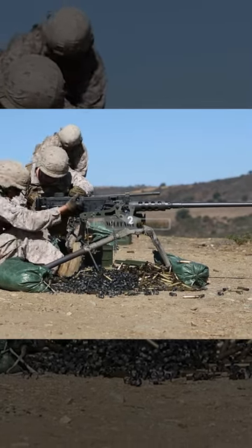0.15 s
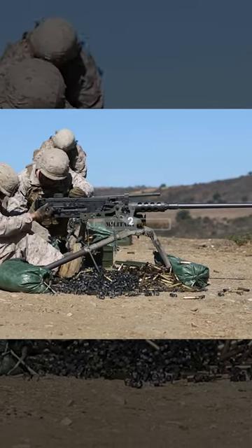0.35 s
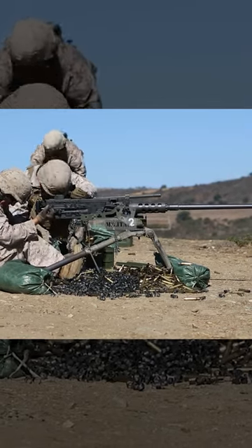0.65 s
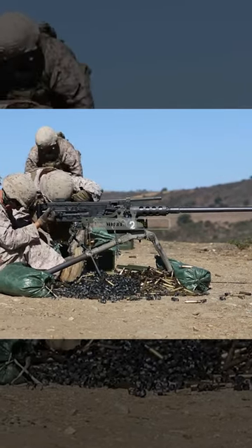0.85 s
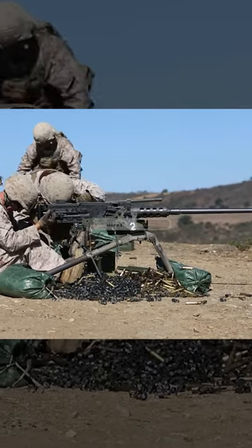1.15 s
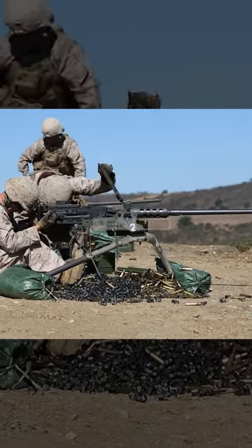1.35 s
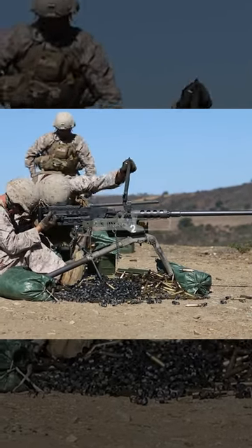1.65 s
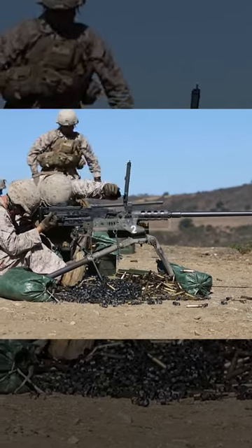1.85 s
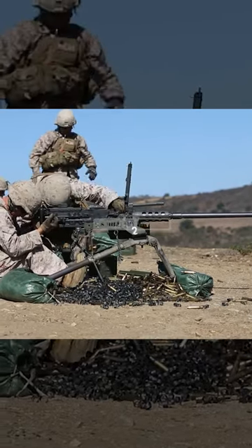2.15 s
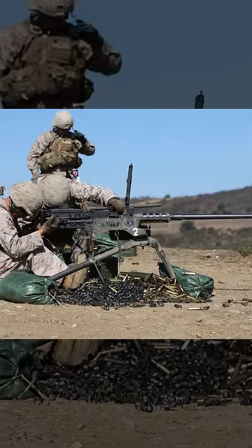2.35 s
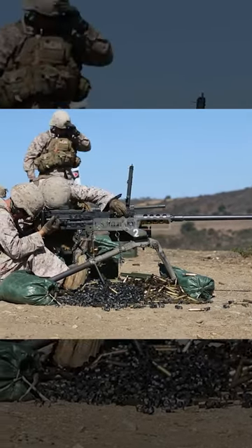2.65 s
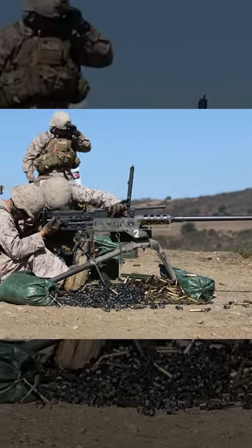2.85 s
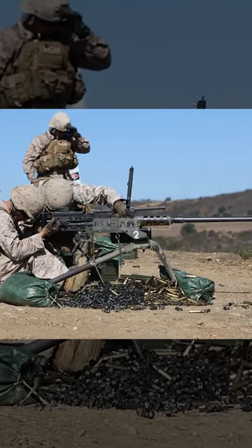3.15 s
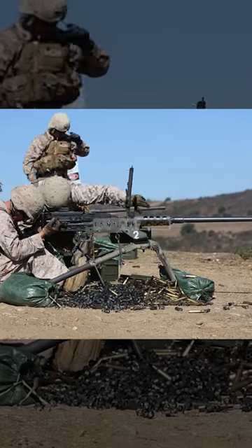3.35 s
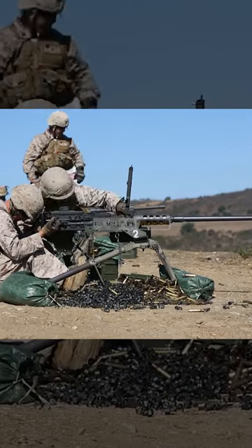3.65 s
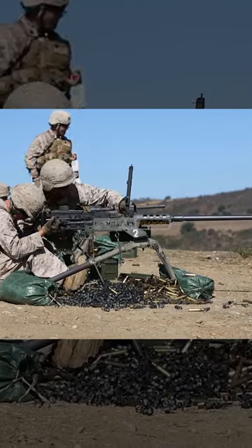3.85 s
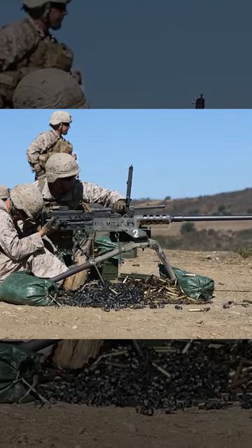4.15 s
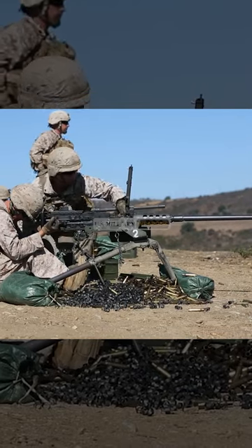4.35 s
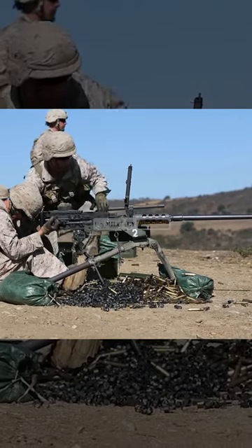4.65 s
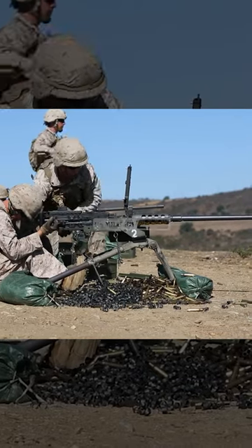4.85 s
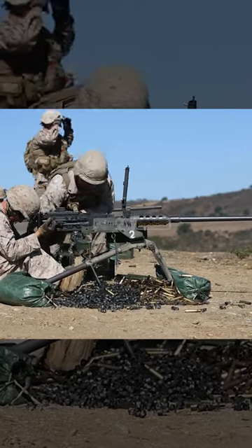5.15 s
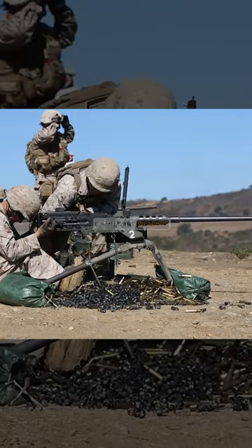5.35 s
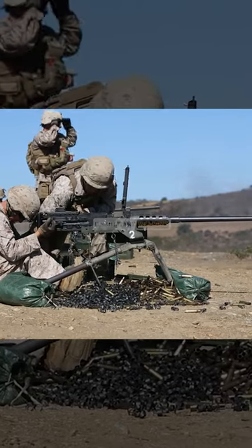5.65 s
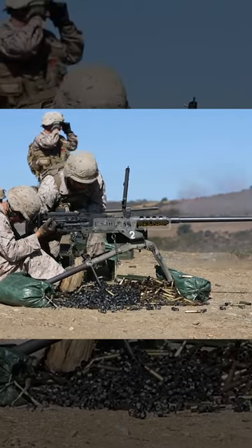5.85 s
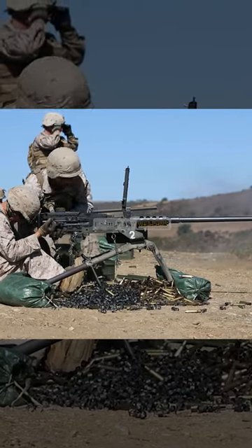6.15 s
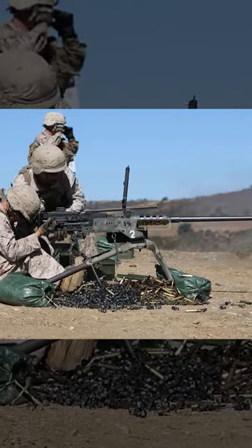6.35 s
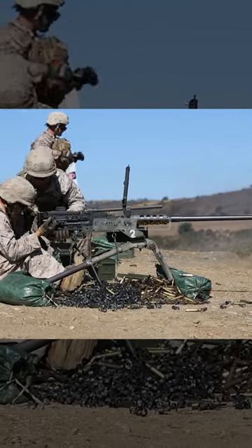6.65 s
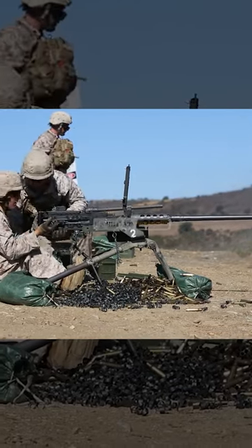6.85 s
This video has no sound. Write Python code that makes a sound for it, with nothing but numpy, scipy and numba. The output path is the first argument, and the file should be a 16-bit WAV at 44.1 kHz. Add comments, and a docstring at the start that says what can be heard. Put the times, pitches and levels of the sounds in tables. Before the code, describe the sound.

Faint outdoor air, light wind rumble on the microphone and a distant idling engine run throughout. From about 0.2 to 0.5 seconds, the action of a heavy machine gun is worked close by with sharp steel clacks and a gritty slide. Latch snaps follow near 1.3 seconds, then more clacks and scrapes, with the bolt slamming home around 1.8 and 2.7 seconds. Belt links jingle between 2.1 and 3.4 seconds. A lull follows, with a faint sleeve brush at 4.6 seconds and a small brass clink at 4.9. At about 5.4 seconds the gun fires one very loud, even burst of eleven rounds, each a crack, blast and mechanical thud, ending near 6.6 seconds. The burst distorts the microphone and the level ducks. Spent links and cases tinkle lightly, and dull thumps echo back from the hills in the last half second.

```python
"""An open firing range among scrubby hills, with a light breeze and an engine idling far off.
A gunner works the action and feed of a heavy machine gun on a tripod: steel clacks and slides ring
the receiver, and belt links jingle. Then comes one burst of eleven rounds, each a crack, a muzzle
blast and a thud of the bolt. It overloads the nearby microphone, whose gain control backs off,
while spent links tumble and the hills send the burst back."""
import sys
import numpy as np
from scipy import signal
from scipy.fft import rfft, irfft
from scipy.io import wavfile
from scipy.ndimage import uniform_filter1d, minimum_filter1d
from numba import njit

SR = 44100
rng = np.random.default_rng(int(sys.argv[2]) if len(sys.argv) > 2 else 0)


def wrap_up_sound(samples):
    """Save the sound to the file named by the first command line argument, as 16-bit audio."""
    columns = np.atleast_2d(samples).T
    # keep every value between -1 and 1, then stretch to whole-number steps
    tamed = np.clip(columns, -1, 1)
    steps = np.round(tamed * 32767).astype(np.int16)
    wavfile.write(sys.argv[1], SR, steps)


N = 309141
TIME = np.arange(N) / SR
AGE = TIME[:SR // 2]  # seconds since a blow


def undb(db):
    """Decibels to gain."""
    return 10 ** (np.asarray(db) / 20)


def unit(x):
    """Scale to rms 1."""
    return x / np.sqrt(np.mean(x ** 2))


def fade(t60):
    """Exponential decay, 60 dB down after t60 seconds."""
    return np.exp(-np.log(1000) * AGE / max(t60, 1e-3))


def rise(seconds):
    """A rounded attack."""
    return 1 - np.exp(-AGE / seconds)


def add(out, s, x):
    """Mix x into out at s seconds."""
    i = min(max(int(round(s * SR)), 0), len(out))
    out[i:i + len(x)] += x[:len(out) - i]


def filt(x, hz, kind, order=2):
    """Butterworth filter."""
    return signal.sosfilt(signal.butter(order, hz, kind, fs=SR, output="sos"), x)


def resonate(x, hz, width):
    """One resonance, gain 1 at its centre."""
    return signal.lfilter(*signal.iirpeak(hz, hz / width, fs=SR), x)


def noise(spectrum, size=len(AGE)):
    """Noise of rms 1, coloured by rows of frequency in Hz and level in dB."""
    hz, db = np.transpose(spectrum)
    gain = undb(np.interp(np.log(np.fft.rfftfreq(size, 1 / SR) + 1), np.log(hz), db))
    return unit(irfft(rfft(rng.standard_normal(size)) * gain, size))


def walk(rate):
    """A smooth random drift of rms 1, turning rate times a second."""
    knots = rng.standard_normal(int(N / SR * rate) + 2)
    path = np.interp(TIME * rate, np.arange(len(knots)), knots)
    return unit(uniform_filter1d(path, int(SR / rate / 2)))


def grit(size, spread_db, rate):
    """Rough envelope of tiny catches and slips, rms 1."""
    knots = np.tanh(rng.standard_normal(int(size / SR * rate) + 2))
    return unit(undb(spread_db * np.interp(TIME[:size] * rate, np.arange(len(knots)), knots)))


def note(hz, t60, rise_s=0.0021):
    """One part of the gun rings out."""
    return np.sin(2 * np.pi * hz * AGE) * fade(t60) * rise(rise_s)


# The dark bed of open air. Each row: frequency in Hz, relative level in dB.
AIR_COLOUR = [(15, -41), (25, 0), (79, -2), (193, -9), (221, -5), (253, -9), (305, -12.5), (509, -20.5),
              (552, -21), (804, -23), (919, -26.5), (2170, -36), (3170, -38.5), (5280, -41), (15500, -47.5)]

def air(level_db=-38.5, drift_db=0.3):
    """Outdoor hush whose level barely drifts."""
    return undb(level_db + drift_db * walk(4)) * noise(AIR_COLOUR, N)


# The tones of the idle. Each row: frequency in Hz, relative level in dB.
ENGINE_TONES = [(74, -79.5), (91.5, -41), (112, -47), (146, -44.5), (167, -46), (182, -42), (221, -43),
                (296, -51.5), (366, -53), (808, -61)]

def engine(gain_db=-1, wander=0.013, throb_db=3.0):
    """A far engine hums: its speed wanders, and each tone throbs and wavers on its own."""
    clock = np.cumsum(1 + wander * walk(1.8)) / SR
    out = np.zeros(N)
    for hz, db in ENGINE_TONES:
        level = undb(db + gain_db + throb_db * walk(5.4))
        out += level * np.sin(2 * np.pi * hz * clock + 0.64 * walk(6.4))
    return out


# Puffs of breeze. Each row: peak time in seconds, half length in seconds, level in dB.
GUSTS = [(0.62, 0.064, -31), (2.54, 0.12, -40.5), (3.64, 0.017, -36), (4.7, 0.55, -46)]

def breeze(calm_db=-44):
    """Wind rumbles on the microphone: a light steady draught with a few puffs."""
    rumble = unit(filt(resonate(rng.standard_normal(N), hz=55, width=78), 140, "low"))
    puffs = sum(undb(db) * np.exp(-((TIME - s) / length) ** 2) for s, length, db in GUSTS)
    return rumble * (undb(calm_db) + puffs)


# The dull wash off the hills. Each row: frequency in Hz, relative level in dB.
HILL_COLOUR = [(30, -18), (80, 6), (200, 5.5), (500, -7), (1100, -0.5), (1900, -8), (3000, -20),
               (6000, -25), (12000, -52)]

def hills(bank_s=1.289, slap_db=-21, slap_hz=210, slap_t60=0.057,
          wash_s=1.49, wash_width_s=0.33, wash_db=-37):
    """Every round comes back as a thump from a far bank and a swell of noise from the slopes."""
    slaps, swell = np.zeros(N), np.zeros(N)
    for s, _ in SHOTS:
        dull = filt(rng.standard_normal(len(AGE)), 410, "low")
        thump = unit(resonate(dull, slap_hz, width=80)) * fade(slap_t60)
        add(slaps, s + bank_s, undb(slap_db) * filt(thump, 1400, "low"))
        swell += np.exp(-((TIME - s - wash_s) / wash_width_s) ** 2)
    return slaps + undb(wash_db) * np.sqrt(swell) * noise(HILL_COLOUR, N)


def sleeve(peak_s=4.62, half_length_s=0.15, hz=2400, width_hz=1000, level_db=-60):
    """Cloth brushes along the gun in one fluttering stroke."""
    stroke = np.exp(-((TIME - peak_s) / half_length_s) ** 2)
    rub = unit(resonate(resonate(rng.standard_normal(N), hz, width_hz), hz, 2 * width_hz))
    return rub * undb(level_db + 2.6 * walk(53)) * stroke


def clinks(hits, modes, detune=0.0052, stagger_s=0.0078, count=3):
    """At each hit, count alike metal pieces strike in turn, slightly out of tune."""
    out = np.zeros(N)
    for s, db, ratio in hits:
        for lag in np.arange(count) * stagger_s * rng.uniform(0.2, 1):
            for (hz, mode_db, t60), (pitch, force) in zip(modes, rng.standard_normal((len(modes), 2))):
                ring = np.sin(2 * np.pi * hz * ratio * (1 + detune * pitch) * AGE) * fade(t60)
                add(out, s + lag, undb(db + mode_db + 2 * force) * ring / np.sqrt(count))
    return out


# The ring of a brass case. Each row: frequency in Hz, relative level in dB, t60 in seconds.
CASE_MODES = [(4963, -8, .24), (6212, -12, .22), (6385, 0, .18), (8900, -11, .2), (11600, -8, .24),
              (12310, -16, .22), (15300, -11, .2)]
# Knocks on the brass. Each row: start in seconds, level in dB, pitch ratio.
CASE_HITS = [(4.925, -40.5, 1.0), (5.96, -46, 1.0), (6.66, -42, 1.0)]

def cases():
    """Brass cases ring one at a time, high and pure."""
    return clinks(CASE_HITS, CASE_MODES, detune=0.001, count=1)


# The ring of a belt link. Each row: frequency in Hz, relative level in dB, t60 in seconds.
LINK_MODES = [(3850, -5.5, 0.24), (5370, -7, 0.15), (7040, 2, 0.15), (7440, -16, 0.17), (9100, -27, 0.16),
              (10400, 8.5, 0.08), (11000, -12, 0.38), (11900, -13, 0.11), (13010, -17, .25),
              (13340, 0, 0.24), (14300, -33, 0.17), (14900, -5, 0.083)]
# Separate jingles. Each row: start in seconds, level in dB, pitch ratio.
LINK_HITS = [(2.107, -50, 1.05), (2.195, -42.5, 1.02), (2.407, -37, .99), (3.163, -44, 1.03),
             (3.232, -41, 1.05), (3.315, -40.5, 1.02), (6.88, -63, 1.0)]

def links():
    """Belt links knock together in small clusters."""
    return clinks(LINK_HITS, LINK_MODES)


def belt(start_s=3.19, end_s=3.31, level_db=-50, ratio=1.04, count=7):
    """The belt is drawn along and its links jostle each other."""
    force, pitch = rng.uniform(-1, 1, (count, 2)).T
    times = np.linspace(start_s, end_s, count)
    return clinks(zip(times, level_db + 3 * force, ratio + 0.03 * pitch), LINK_MODES)


def spill(start_s=5.75, end_s=7.0, level_db=-57, count=24):
    """Spent links tumble onto the heap under the gun."""
    jitter, force, pitch = rng.uniform(-1, 1, (count, 3)).T
    times = np.linspace(start_s, end_s, count) + 0.04 * jitter
    return clinks(zip(times, level_db + 4 * force, 1 + 0.025 * pitch), LINK_MODES)


# Small stray notes. Each row: start in seconds, pitch in Hz, level in dB, t60 in seconds.
PINGS = [(2.072, 556, -25, .1), (2.107, 2800, -42, 0.17), (2.196, 5700, -45, 0.5), (2.85, 533, -31, 0.12),
         (3.322, 5930, -29, .11)]

def pings():
    """A nudged tray, pin or catch rings by itself."""
    out = np.zeros(N)
    for s, hz, db, t60 in PINGS:
        add(out, s, undb(db) * note(hz, t60))
    return out


# The thin, bright colour of a latch. Each row: frequency in Hz, relative level in dB.
LATCH_COLOUR = [(300, -28), (1000, -19), (2700, 3), (4400, 5.5), (7000, -5.5), (11000, -5.5),
                (15000, -11.5)]
# Its snaps. Each row: start in seconds, level in dB.
LATCH_SNAPS = [(0.2060, -19), (1.3265, -12), (1.4558, -11)]

def latch(t60=0.021, rise_s=0.00021):
    """A sprung catch flicks over: a short snap with no body."""
    out = np.zeros(N)
    for s, db in LATCH_SNAPS:
        add(out, s, undb(db) * noise(LATCH_COLOUR) * fade(t60) * rise(rise_s))
    return out


# The dense modes of the whole gun. Each row: frequency in Hz, relative level in dB.
STEEL_COLOUR = [(100, -26), (300, -0.5), (430, -16), (720, -2), (950, -4), (1600, -8), (3200, -0.5),
                (6000, -11), (10000, -8.5), (15000, -16.5)]

def steel(body_db, treble_db, size=len(AGE), patchy_db=-1.26):
    """Steely noise: heavy parts add body, small ones treble; each contact favours other modes."""
    hz = np.geomspace(100, 16000, 28)
    steel_hz, steel_db = np.transpose(STEEL_COLOUR)
    base = np.interp(np.log(hz), np.log(steel_hz), steel_db)
    tilt = np.interp(np.log(hz), np.log([700, 1700, 4000, 9000]), [body_db, 0, 0, treble_db])
    patches = patchy_db * rng.standard_normal(len(hz))
    return noise(np.column_stack([hz, base + tilt + patches]), size)


def loose_parts(count=14, low_hz=1200, high_hz=12000):
    """A handful of chance modes, rms 1: every blow shakes different small parts."""
    hz = np.exp(rng.uniform(np.log(low_hz), np.log(high_hz), (count, 1)))
    return unit(np.sin(2 * np.pi * hz * AGE).sum(0))


def blow(body_db, treble_db, t60, rattle_db=-27, rattle_t60=0.28, ring_db=-7, ring_t60=0.048):
    """Steel meets steel: the clack dies fast and leaves loose parts ringing and rattling."""
    rattle = undb(rattle_db) * fade(rattle_t60) * grit(len(AGE), spread_db=10, rate=243)
    clack = steel(body_db, treble_db) * (fade(t60) + rattle)
    ring = undb(ring_db) * loose_parts() * fade(ring_t60)
    return (clack + ring) * rise(0.00014)


# Light taps. Each row: start in seconds, relative level in dB, treble in dB.
TAPS = [(0.009, -35.5, -4), (0.019, -33, 9.5), (0.171, -33, 8), (0.374, -24.5, 6), (0.511, -39, -12),
        (0.571, -33, -47), (1.254, -34, 7), (1.336, -26, 5.5), (1.364, -31, 1), (1.38, -36, -14),
        (1.760, -36.5, -15), (2.107, -31, 30), (2.302, -33.5, -8), (2.476, -39, -6), (2.833, -44, -1),
        (3.0851, -39.5, -7), (3.186, -33.5, 9), (3.233, -36.5, 5), (4.458, -46, -9), (4.925, -48, -8)]

def taps(gain_db=-2, body_db=-1, t60=0.063):
    """Fingers, catches and links tap the gun, all with a thin body and a short ring."""
    out = np.zeros(N)
    for s, db, treble_db in TAPS:
        add(out, s, undb(db + gain_db) * blow(body_db, treble_db, t60))
    return out


# Gritty slides. Each row: start in seconds, end in seconds, relative level in dB.
SLIDES = [(0.175, 0.3, -43.5), (0.293, 0.461, -33), (1.447, 1.543, -35), (1.545, 1.633, -30.5),
          (1.89, 2.004, -41), (2.061, 2.151, -36.5), (2.181, 2.292, -44), (2.317, 2.445, -30),
          (3.154, 3.382, -51)]

def scraping(gain_db=-4, edge_s=0.018):
    """The hand drags steel over steel, easing in and out; the surfaces catch and slip."""
    force = np.zeros(N)
    for start, end, db in SLIDES:
        force += undb(db + gain_db) * np.clip(np.minimum(TIME - start, end - TIME) / edge_s, 0, 1)
    return force * steel(body_db=4, treble_db=-1, size=N) * grit(N, spread_db=9, rate=250)


# The handle is let go and the bolt flies home. Each row: arrival in seconds, relative level in dB.
RELEASES = [(1.838, -13), (2.669, -8)]

def bolt_run(rush_db=-5, rush_s=0.0066, stop_s=0.0031, shudder_db=-26, lead_s=0.064, settle_s=0.08):
    """The spring throws the bolt with a swelling scrape; the feed chatters before and after."""
    rush, shudder = np.zeros(N), np.zeros(N)
    for s, db in RELEASES:
        before, after = np.maximum(s - TIME, 0), np.maximum(TIME - s, 0)
        rush += undb(db + rush_db) * np.exp(-before / rush_s - after / stop_s)
        shudder += undb(db + shudder_db) * np.exp(-before / lead_s - after / settle_s)
    metal = noise(STEEL_COLOUR, N)
    return metal * (rush * grit(N, spread_db=5, rate=350) + shudder * grit(N, spread_db=12, rate=130))


def spring(hz=1980, level_db=-29, lag_s=0.12, t60=0.052):
    """The spring twangs just after the released bolt arrives."""
    out = np.zeros(N)
    for s, _ in RELEASES:
        add(out, s + lag_s, undb(level_db) * note(hz, t60))
    return out


# The hand-worked bolt hits its stops. Each row: start in seconds, relative level in dB, body in dB,
# treble in dB, t60 in seconds, pitch of the struck part in Hz, its offset from the row's level in dB.
CLACKS = [(0.229, -17, 6.5, -7, 0.031, 624, -12), (0.2938, -9, 5, 0.5, 0.029, 611, -0.5),
          (0.330, -11, -31, -1.5, 0.033, 3070, -8), (0.4099, -8.5, -3.5, -0.5, 0.039, 727, 7),
          (1.504, -16, -3, -5, 0.046, 590, -3), (1.5918, -13.5, 0, -3, 0.054, 1183, 3),
          (1.836, -17, 2.5, 0, 0.16, 696, -21), (1.847, -49, 15, -8, 0.12, 570, -29),
          (1.863, -13.5, 2, 5.5, 0.038, 588, -3), (2.329, -15, 4, 0, 0.023, 590, -18),
          (2.4063, -11.5, 2.5, -2.5, .06, 563, -14), (2.6138, -25.5, -1, 0, 0.24, 600, -2),
          (2.673, -8.5, -7, 5, 0.02, 630, 0), (2.689, -12.5, -1, -2, 0.051, 633, -15)]

def clacks(gain_db=-2.0, touch_s=0.0038, touch_db=-17, touch_t60=0.03):
    """The bolt touches each stop, then slams home; light parts make a softer first touch."""
    out = np.zeros(N)
    for s, db, body_db, treble_db, t60, _, _ in CLACKS:
        add(out, s, undb(db + gain_db) * blow(body_db, treble_db, t60))
        touch = steel(body_db, treble_db) * fade(touch_t60)
        add(out, s - touch_s, undb(db + touch_db + min(body_db, 0)) * touch)
    return out


def struck_parts(t60=0.033):
    """Each clack rings one part at its own pitch."""
    out = np.zeros(N)
    for s, db, *_, hz, note_db in CLACKS:
        add(out, s, undb(db + note_db) * note(hz, t60))
    return out


def rebounds(gap_s=0.023, first_db=-21, loss_db=5, count=3):
    """Loose parts bounce after every clack, at uneven gaps and weaker each time."""
    out = np.zeros(N)
    for (s, db, *_), gaps in zip(CLACKS, gap_s * rng.uniform(0.6, 1.6, (len(CLACKS), count))):
        for k, lag in enumerate(np.cumsum(gaps)):
            bounce = blow(body_db=8, treble_db=0, t60=0.044)
            add(out, s + lag, undb(db + first_db - k * loss_db) * bounce)
    return out


# The hollow voice of the receiver. Each row: frequency in Hz, width in Hz, relative level in dB.
RECEIVER_MODES = [(578, 108, 8.5), (1405, 350, -1), (1934, 220, -1.5), (2570, 290, -5.5), (3197, 56, -1.5),
                  (4450, 65, -29), (4730, 440, -5.5), (6160, 1300, 1.5), (6520, 36, -21), (7200, 58, 0),
                  (9200, 42, -57), (12000, 89, 3.5)]

def receiver(force, ring_db=3):
    """The receiver's resonances ring on top of whatever shakes it."""
    return force + sum(undb(db + ring_db) * resonate(force, hz, width) for hz, width, db in RECEIVER_MODES)


# The thud of the bolt in the receiver. Each row: frequency in Hz, relative level in dB.
THUD_COLOUR = [(50, -35), (120, 1), (220, 11.5), (300, 3.5), (550, -1.5), (800, -6), (1300, -13),
               (2300, -20), (7000, -23), (15000, -39.5)]

def action(recoil_db=-30, recoil_t60=0.0092, home_s=0.0915, thud_db=-11, thud_t60=0.13, close_db=-21):
    """After each shot the bolt hits the buffer, the belt jerks on and the bolt thuds home."""
    out = np.zeros(N)
    for s, _ in SHOTS:
        for lag_s, db in ((0.051, 0), (0.077, -6)):  # buffer, then belt
            knock = filt(noise(STEEL_COLOUR), 2700, "low", order=1) * fade(recoil_t60)
            add(out, s + lag_s, undb(recoil_db + db) * knock)
        add(out, s + home_s, undb(thud_db) * noise(THUD_COLOUR) * fade(thud_t60) * rise(0.001))
    add(out, SHOTS[-1][0] + home_s, undb(close_db) * note(hz=2310, t60=0.05))  # the last closing rings
    return out


# Slaps off ground, crew and sandbags. Each row: delay in milliseconds, relative level in dB.
REFLECTIONS = [(5.7, -7), (9.0, -5.5), (13.2, -2), (17.4, -0.5), (20.7, -8), (26.4, -5), (42.2, -12.5),
               (53.2, -15.5)]
# The low boom around the gun. Each row: frequency in Hz, level in dB, t60 in seconds.
BOOM_MODES = [(137, -5.5, 0.12), (264.6, -27, 0.3), (364, -27.5, 0.4), (524, -6.5, 0.075),
              (623, -11.5, 0.082)]

def emplacement(push_s, echo_hz=240, echo_width_hz=260, echo_db=7, boom_lag_s=0.00484):
    """The gun position answers a blast with dull close reflections and a hanging boom."""
    out = np.zeros(len(AGE))
    echo = resonate(blast(push_s), echo_hz, echo_width_hz)
    for ms, db in REFLECTIONS:
        add(out, ms / 1000, undb(db + echo_db) * echo)
    for hz, db, t60 in BOOM_MODES:
        add(out, boom_lag_s, undb(db) * np.sin(2 * np.pi * hz * AGE) * fade(t60))
    return out


def blast(push_s):
    """Muzzle blast: a shock front, overpressure for push_s, then a weaker suction."""
    return (1 - AGE / push_s) * np.exp(-AGE / push_s)


# The roar of muzzle gas and of scatter off rough ground. Each row: frequency in Hz, relative level in dB.
ROAR_COLOUR = [(60, -48), (200, 3), (550, 0), (900, -3), (1500, 1), (3200, -6), (7000, -10.5), (15000, -23)]
# The burst. Each row: start in seconds, relative level in dB.
SHOTS = [(5.4484, 2.5), (5.5657, 1.5), (5.6778, -0.5), (5.7875, 0.5), (5.9000, 1), (6.0093, 2),
         (6.1183, 2.5), (6.2290, 3), (6.3354, 3), (6.4444, 3.5), (6.5538, 1)]

def gunfire(crack_hz=3200, crack_db=24, crack_t60=0.0017, blast_db=20, blast_lag_s=0.00082,
            push_s=0.0012, gas_db=15, gas_t60=0.007, gas_lag_s=0.001608, ground_s=0.0056, ground_db=-21,
            scatter_db=-7, scatter_t60=0.067, tail_db=-36, tail_t60=0.58, shared=0.55):
    """Crack, blast and turbulent gas; the surroundings answer every round in nearly the same way."""
    out = np.zeros(N)
    answer = emplacement(push_s)
    terrain = noise(ROAR_COLOUR)  # the part of the scatter that all rounds share
    scatter_decay = undb(scatter_db) * fade(scatter_t60) + undb(tail_db) * fade(tail_t60)
    for (s, db), (pitch, force_db, length) in zip(SHOTS, rng.standard_normal((len(SHOTS), 3))):
        shot = -undb(crack_db) * np.sin(2 * np.pi * crack_hz * (1 + 0.12 * pitch) * AGE) * fade(crack_t60)
        add(shot, blast_lag_s, undb(blast_db + force_db) * blast(push_s * (1 + 0.21 * length)))
        gas = filt(noise(ROAR_COLOUR), 430, "high") * fade(gas_t60)
        add(shot, gas_lag_s, undb(gas_db) * gas)
        # the ground returns the sharp part of the report, then its stones and ruts scatter the rest
        bounce = filt(filt(shot, 190, "high"), 2500, "low", order=1)
        add(shot, ground_s, undb(ground_db) * bounce)
        scatter = np.sqrt(shared) * terrain + np.sqrt(1 - shared) * noise(ROAR_COLOUR)
        add(shot, ground_s, scatter * scatter_decay)
        add(out, s, undb(db) * (shot + answer))
    return out


def scene():
    """Everything as it reaches the microphone, in mono."""
    handling = receiver(clacks() + taps() + rebounds() + scraping() + bolt_run())
    small_parts = struck_parts() + pings() + spring() + latch()
    jingle = links() + belt() + cases() + spill()
    gun = handling + small_parts + jingle + sleeve() + gunfire() + action()
    return (gun + hills() + engine() + air() + breeze())[None]


@njit
def gain_control(wanted_db, attack, release):
    """Gain in dB that falls at the attack rate and recovers at the release rate."""
    out, gain_db = np.empty(len(wanted_db)), 0.
    for i in range(len(wanted_db)):
        gain_db += (wanted_db[i] - gain_db) * (attack if wanted_db[i] < gain_db else release)
        out[i] = gain_db
    return out


def record(dry, rail=1.9, droop_hz=100, low_cut_hz=72, top_hz=15800,
           ceiling_db=-4.0, range_db=12.5, attack_s=0.19, release_s=0.27):
    """The preamp clips, its flat tops droop, gain control backs off and the converter clips the rest."""
    x = np.clip(dry[0], -rail, rail)
    x = filt(filt(x, droop_hz, "high", order=1), low_cut_hz, "high", order=1)
    peak = -minimum_filter1d(-np.abs(x), size=5001, origin=2500)  # peaks are held for 113 ms
    wanted_db = np.clip(ceiling_db - 20 * np.log10(peak + 1e-9), -range_db, 0)
    gain_db = gain_control(wanted_db, 1 / (attack_s * SR), 1 / (release_s * SR))
    x = np.clip(x * undb(gain_db), -1, 1)
    steep_low_pass = signal.ellip(8, 0.2, 70, top_hz, fs=SR, output="sos")
    return signal.sosfilt(steep_low_pass, x)[None]


dry = scene()
out = record(dry)
wrap_up_sound(out)
```